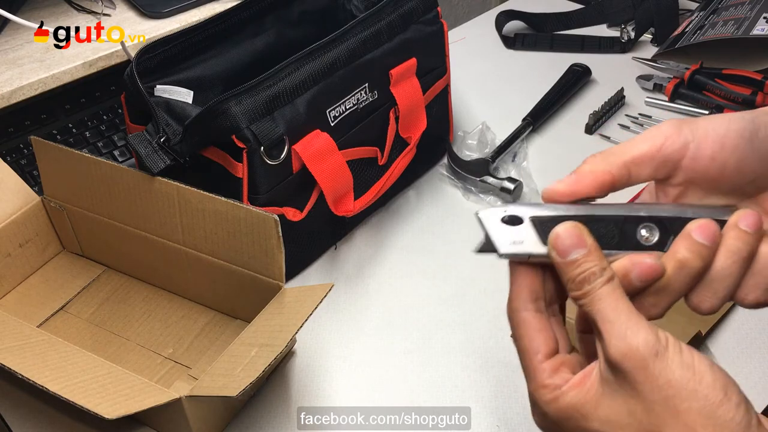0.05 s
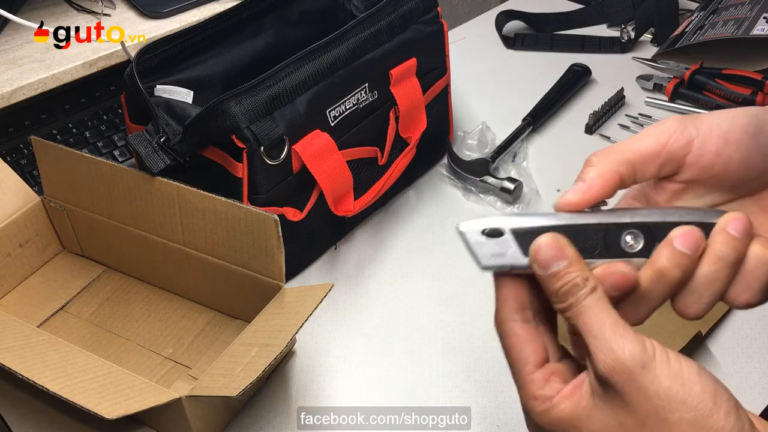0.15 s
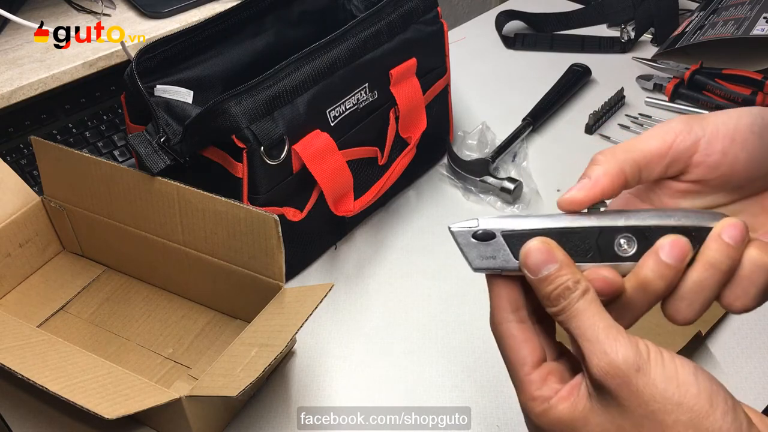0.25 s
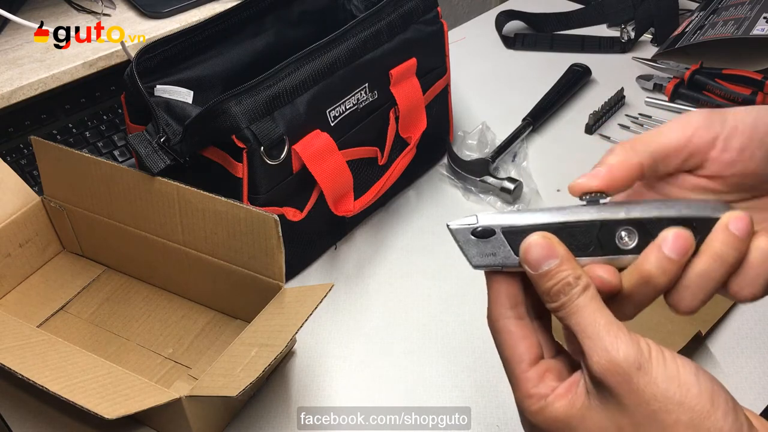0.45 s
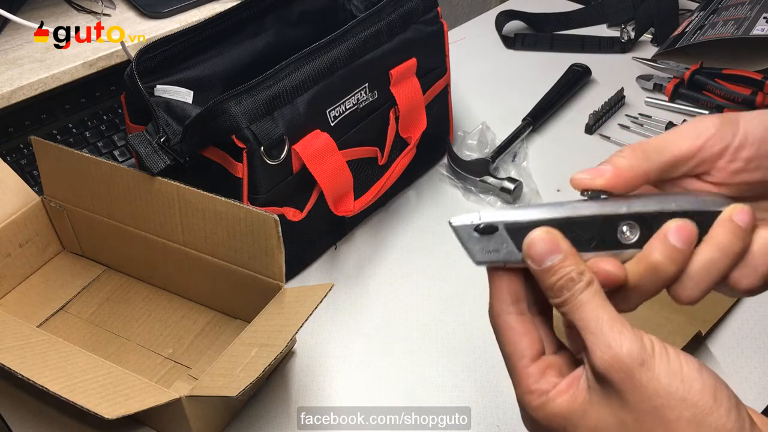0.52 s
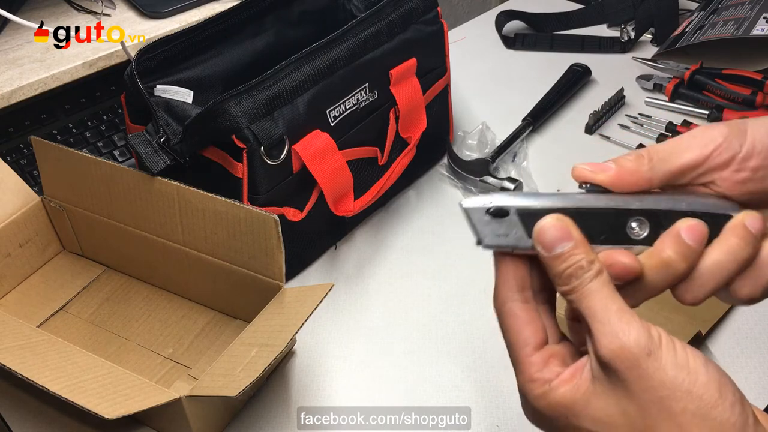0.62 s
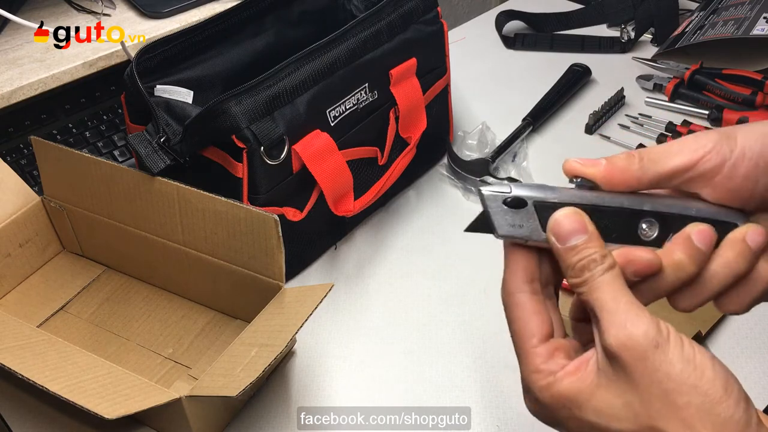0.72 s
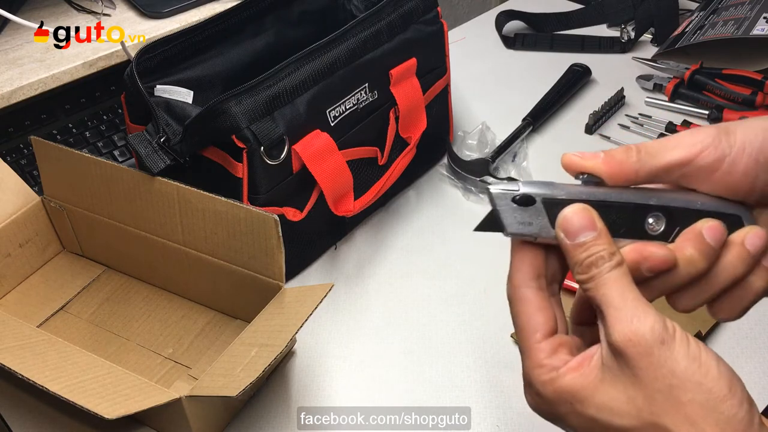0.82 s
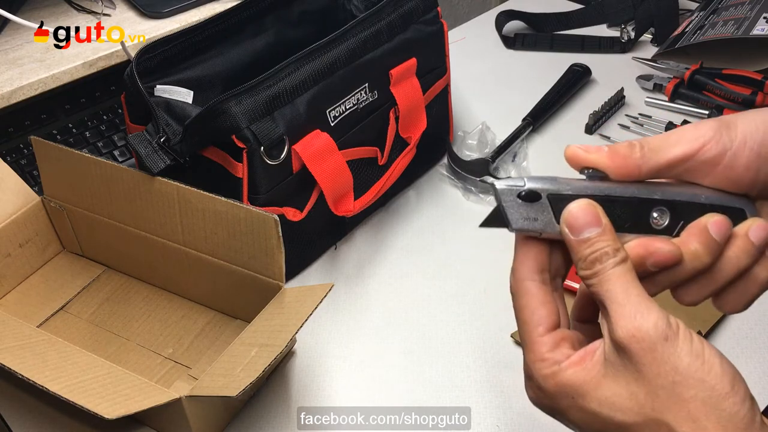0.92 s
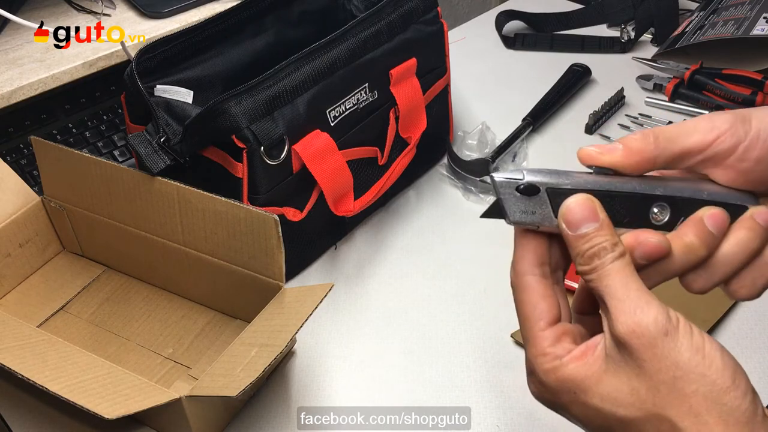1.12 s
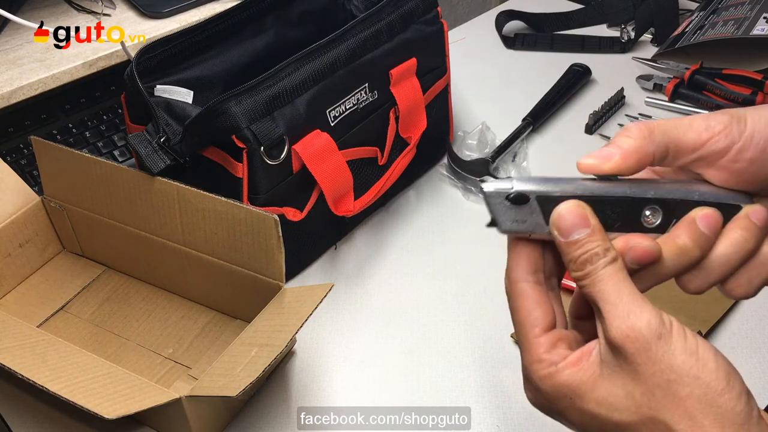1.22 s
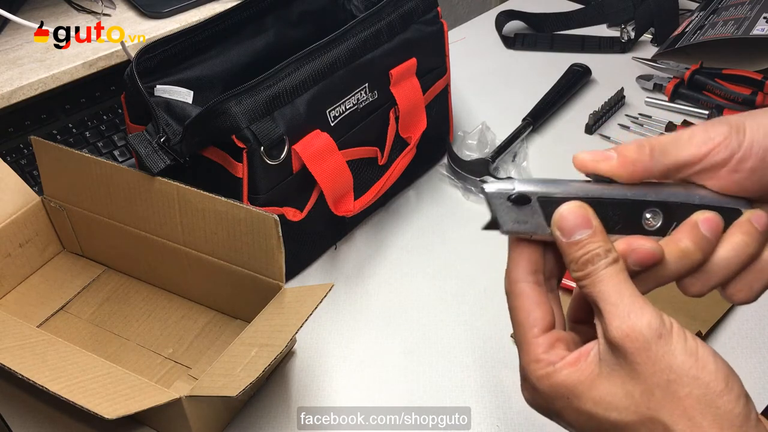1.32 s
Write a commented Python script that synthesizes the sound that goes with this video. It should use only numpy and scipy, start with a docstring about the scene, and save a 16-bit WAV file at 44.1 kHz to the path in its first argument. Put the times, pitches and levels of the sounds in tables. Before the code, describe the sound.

A metal retractable utility knife: sharp double clack, then a softer scrape and locking click.

```python
"""Scrapes, sharp clicks and light ticks of a metal utility knife, thumbed over a desk in a small room.
The blade carrier scrapes along its track, snaps through the notches and hits the back stop;
it is pushed out again until it locks with a ring of the blade, then starts back once more.
Steel knocks are damped resonances, chatter and scraping are filtered random contacts, and shell and
blade ring as decaying sines. Room scatter and tail, air tone and a low hum lie around the knife."""
import sys
import numpy as np
from scipy import signal
from scipy.fft import rfft, irfft
from scipy.io import wavfile

SR = 44100
rng = np.random.default_rng(int(sys.argv[2]) if len(sys.argv) > 2 else 0)


def master_out(mix):
    """Clip the mix to full scale and print it as 16-bit PCM to the path in sys.argv[1]."""
    frames = np.transpose(np.atleast_2d(mix))
    ceiling = np.clip(frames, -1, 1)
    pcm = np.round(ceiling * 32767).astype(np.int16)
    wavfile.write(sys.argv[1], SR, pcm)


N = 59535  # samples, 1.35 s

# Loud clicks of the mechanism. Each row: start in seconds, part that knocks, knock level in dB,
# chatter level in dB, chatter tilt in dB per octave, shell ring in dB, room tail in dB.
CLICK_EVENTS = [(0.2104, "latch", -16, -26, 2.5, -33, -10), (0.2427, "slider", -26, -34, 11, -54, -2),
                (0.2696, "stop", -16, -20, 3, -32, -9), (0.6490, "slider", -38, -45, -1, -49.5, -10.5),
                (0.8176, "lock", -29.5, -33, 2, -51.5, -15)]
# Light ticks of the loose blade and slider. Each row: start in seconds, level in dB, tilt in dB per octave.
TICK_EVENTS = [(0.0761, -50.5, 4.5), (0.125, -52.5, -3), (0.1561, -49, 1), (0.1673, -43, 0.5),
               (0.1722, -39.5, -5.5), (0.2108, -23.5, -3), (0.2134, -26, 1), (0.2476, -30.5, 1),
               (0.2714, -23, -3.5), (0.2771, -26.5, 0.5), (0.3638, -42.5, -8), (0.7055, -47.5, -6),
               (0.7233, -47.5, 22), (0.7303, -51, 5), (0.779, -53, 0), (0.8032, -52, 2), (0.813, -49.5, 13),
               (1.1567, -51.5, -2.5), (1.2028, -62.5, -5.5), (1.2135, -61.5, 0), (1.2503, -68, 4),
               (1.2825, -47.5, -4), (1.2985, -50.5, 11), (1.307, -53, -3.5)]
# Sliding of the carrier. Each row: time in seconds, scrape level in dB, fine grit level in dB.
SLIDE_LEVELS = [(0.0, -89, -83), (0.056, -69, -74.5), (0.085, -62, -63.5), (0.145, -54, -64),
                (0.174, -47, -59), (0.204, -56, -61.5), (0.3, -60, -64), (0.499, -70, -67.5),
                (0.64, -68.5, -68), (0.69, -65.5, -78), (0.721, -57.5, -72), (0.745, -47.5, -54),
                (0.774, -48.5, -64.5), (0.791, -64, -61), (0.815, -57.5, -59), (0.858, -76.5, -72.5),
                (1.14, -85.5, -85.5), (1.21, -79, -76.5), (1.268, -69, -80), (1.302, -43.5, -58),
                (1.32, -67, -68), (1.333, -53.5, -60.5), (1.35, -78, -61)]
# Blows that leave the blade ringing. Each row: start in seconds, level in dB.
BLADE_BLOWS = [(0.2106, -38), (0.8181, -40)]
# Damped resonances, listed by part name. Each row: frequency in Hz, relative level in dB.
PART_RESONANCES = {"latch": [(1450, -20), (2080, -9), (2520, -8.5), (3120, -2), (3800, -6.5), (4600, -14),
                   (5380, -6.5), (7850, -2.5), (8150, 3), (9500, -5), (9920, -12), (11300, -3.5),
                   (11900, -5.5), (14500, -11), (15250, -7.5)], "stop": [(1950, -7), (2510, -1.5),
                   (3200, -6), (3730, -9.5), (4300, -8), (5450, 0), (5850, 0), (6580, 3), (7250, 0),
                   (7970, -4.5), (9270, 2.5), (11400, 0.5), (13200, -4.5), (15000, -7)],
                   "lock": [(2420, -7.5), (3080, 2.5), (3280, -7), (4550, -21), (5500, -13), (5980, -5),
                   (6500, -5), (8350, -10.5), (9200, -6), (11000, -26), (12100, -22), (14000, -17),
                   (15400, -16)], "slider": [(2200, -2), (2480, 0), (3150, -4), (4000, -6.5), (4850, -3.5),
                   (5400, -7.5), (5900, -10.5), (6800, -6.5), (8200, -16), (10900, -21.5)]}
# Ringing modes of the handle shell. Each row: frequency in Hz, relative level in dB, 60 dB decay in seconds.
SHELL_MODES = [(1782, -9, .28), (1914, -2, .28), (1952, -2, .26), (2040, -3, .26), (2101, 0, .28),
               (2436, -1, .2), (2586, -4, .16), (3182, -6, .3), (3698, -7, .22), (4260, -8, .25),
               (5570, -9, .2), (5680, -9, .32), (5780, -8, .18), (5889, -7, .2), (6492, -12, .3),
               (6965, -13, .3)]
# Ringing modes of the blade. Each row: frequency in Hz, relative level in dB, 60 dB decay in seconds.
BLADE_MODES = [(3004, -8, .3), (3058, -3, .34), (3113, -5, .16), (3222, -5, .42), (3256, 0, .28),
               (3370, -8, .3), (3458, -4, .28), (6158, -17, .35)]
# Dull push of the whole handle at the back stop. Each row: frequency in Hz, relative level in dB.
THUMP_MODES = [(215, -4), (345, 2), (690, -2), (950, -0.5)]
# Spectrum of buzzing faces in a loud click. Each row: frequency in Hz, relative level in dB per Hz.
CHATTER_SPECTRUM = [(100, -43), (600, -11.5), (1100, -17), (1550, -17.5), (2100, 8), (2800, -8.5),
                    (3250, 9), (4200, 1), (6000, 3.5), (9300, -1), (10400, -4.5), (11700, -2.5),
                    (15500, -7)]
# Spectrum of a light tick. Each row: frequency in Hz, relative level in dB per Hz.
TICK_SPECTRUM = [(200, -36), (1300, -24.5), (1700, -11.5), (2150, 3), (2850, -7.5), (3300, 0), (4000, -8.5),
                 (6500, -1.5), (12000, -2), (15000, -20)]
# Spectrum of the carrier on its track. Each row: frequency in Hz, relative level in dB per Hz.
SCRAPE_SPECTRUM = [(200, -31.5), (1400, -18), (1650, -16), (1900, 3), (2300, 1), (2800, -5), (3250, -1),
                   (4200, -11.5), (5400, -17), (6800, -17), (7600, -19.5), (16000, -31)]
# Spectrum of the fine grit. Each row: frequency in Hz, relative level in dB per Hz.
GRIT_SPECTRUM = [(500, -36), (3000, -5.5), (5500, -0.5), (8000, -5.5), (9500, 1.5), (10400, -14.5),
                 (12000, -4), (15500, -16.5)]
# Decay of the room tail. Each row: frequency in Hz, 60 dB decay in seconds.
ROOM_DECAY = [(200, .35), (1300, 0.46), (3500, 0.37), (6500, 0.37), (10000, .22), (16000, 0.33)]
# Spectrum of the steady room air. Each row: frequency in Hz, relative level in dB per Hz.
AIR_SPECTRUM = [(25, -15), (50, -12), (75, -9.5), (105, -5.5), (125, -11), (160, -6), (220, -14),
                (500, -19.5), (1000, -21.5), (1800, -29), (3100, -37.5), (8000, -44), (16000, -48.5)]

KNOCK_T60_S, KNOCK_SPREAD_S, KNOCK_LOW_HZ = .008, .0006, 1440
SEAT_POWER = 1.3  # above 1, the damping grows with time
CHATTER_T60_S, TICK_T60_S, CONTACT_RISE_S = .011, .012, .0003
GRAINS_PER_S, SCRAPE_SPREAD_DB, GRIT_SPREAD_DB = 2500, 3.5, 1
SCRAPE_RING_DB = -10  # relative to the scrape
THUMP_S, THUMP_T60_S, THUMP_DB = 0.2703, .035, -47
EARLY_DB, EARLY_T60_S, SMALL_ROOM_DB = -10.5, .055, -14
SIDE_SHARE = 0.25  # energy share of the room sound that leaves the knife's other sides
ROOM_TONE_DB = -61.5
HUM_HZ, HUM_DB, HUM_WAVER_DB = 49, -61, 2
BUMP_S, BUMP_RISE_S, BUMP_HZ, BUMP_DB = 0.815, .028, 88, -53
CUTOFF_HZ = 15900


def amp(db):
    """Decibels to gain."""
    return 10 ** (np.asarray(db) / 20)


def decay(t, t60):
    """Exponential decay that falls 60 dB in t60 seconds."""
    return np.exp(-np.log(1000) * t / t60)


def unit(x):
    """Scales to an rms of one."""
    return x / np.sqrt(np.mean(x ** 2) + 1e-20)


def blow(x):
    """Scales a short sound to the energy of 2.5 ms at an rms of one."""
    return x * np.sqrt(.0025 * SR / (np.sum(x ** 2) + 1e-20))


def read(points, hz):
    """Reads a frequency table on a log-frequency axis."""
    f, value = np.transpose(points)
    return np.interp(np.log(hz + 1), np.log(f + 1), value)


def add(mix, s, sound):
    """Mixes a sound in at time s."""
    part = mix[max(0, round(s * SR)):][:len(sound)]
    part += sound[:len(part)]


def colour(x, points, tilt_db=0):
    """Causal minimum-phase filter with the given spectrum, tilted per octave above 2 kHz."""
    hz = abs(np.fft.fftfreq(4096, 1 / SR))
    octaves = np.log2(np.maximum(hz, 2000) / 2000)
    log_gain = np.log(amp(read(points, hz) + tilt_db * octaves))
    # the Hilbert transform of the log gain gives the phase
    taps = np.fft.ifft(np.exp(np.conj(signal.hilbert(log_gain)))).real
    return signal.fftconvolve(x, taps[:len(taps) // 2])[:len(x)]


def click(part, knock_db, chatter_db, tilt_db, shell_db, room_db):
    """A part knocks home, chatters and sets the shell ringing; the room answers."""
    direct, sides = np.zeros((2, SR * 3 // 4))
    add(direct, 0, amp(knock_db) * knock(PART_RESONANCES[part]))
    add(direct, 0, amp(chatter_db) * chatter(CHATTER_T60_S, CHATTER_SPECTRUM, tilt_db))
    add(direct, 0, amp(shell_db) * ring(SHELL_MODES))
    # the other sides, without the part's resonances, are heard only through the room
    impulse = signal.unit_impulse(SR // 20)
    add(sides, 0, amp(knock_db) * blow(colour(impulse, CHATTER_SPECTRUM, tilt_db)))
    front_room = np.sqrt(1 - SIDE_SHARE) * room(direct, room_db)
    side_room = np.sqrt(SIDE_SHARE) * room(sides, room_db)
    return direct + front_room + side_room


def knock(modes):
    """Resonances of a small steel part: its faces meet one after another, and damping grows as it seats."""
    t = np.arange(SR // 20) / SR
    out = np.zeros(len(t))
    for hz, db in modes:
        age = np.maximum(t - KNOCK_SPREAD_S * rng.random(), 0)
        seating = np.exp(-np.log(1000) * (age / KNOCK_T60_S) ** SEAT_POWER)
        out += amp(db) * seating * np.sin(2 * np.pi * hz * age)
    highpass = signal.butter(3, KNOCK_LOW_HZ, "high", fs=SR, output="sos")
    return blow(signal.sosfilt(highpass, out))


def chatter(t60, spectrum, tilt_db):
    """Metal faces buzz against each other for a few milliseconds, as decaying random contacts."""
    t = np.arange(SR // 20) / SR
    rise = np.minimum(t / CONTACT_RISE_S, 1)
    contacts = rng.choice([-1., 1.], len(t)) * rise * decay(t, t60)
    return blow(colour(contacts, spectrum, tilt_db))


def ring(modes):
    """Long-lived modes after one blow, each a decaying sine at a random phase."""
    t = np.arange(SR // 2) / SR
    out = np.zeros(len(t))
    for hz, db, t60 in modes:
        out += amp(db - 60 * t / t60) * np.sin(2 * np.pi * (hz * t + rng.random()))
    return blow(out)


def slide():
    """The carrier slips along its track, sounding the hollow handle, with fine grit above."""
    t = np.arange(N) / SR
    s, scrape_db, grit_db = np.transpose(SLIDE_LEVELS)
    scrape = unit(colour(slips(SCRAPE_SPREAD_DB), SCRAPE_SPECTRUM)) * amp(np.interp(t, s, scrape_db))
    grit = unit(colour(slips(GRIT_SPREAD_DB), GRIT_SPECTRUM)) * amp(np.interp(t, s, grit_db))
    shell = unit(signal.fftconvolve(scrape, ring(SHELL_MODES))[:N]) * scrape.std()
    return scrape + grit + amp(SCRAPE_RING_DB) * shell


def slips(spread_db):
    """A random train of tiny slips of uneven size."""
    size = amp(spread_db * np.minimum(rng.exponential(1, N), 4))
    sign = rng.choice([-1., 1.], N)
    happens = rng.random(N) < GRAINS_PER_S / SR
    return unit(size * sign * happens)


def blade():
    """The thin blade rings on in a cluster of close tones."""
    out = np.zeros(N)
    for s, db in BLADE_BLOWS:
        add(out, s, amp(db) * ring(BLADE_MODES))
    return out


def ticks():
    """Light contacts as the slider takes up its play."""
    out = np.zeros(N)
    for s, db, tilt_db in TICK_EVENTS:
        add(out, s, amp(db) * chatter(TICK_T60_S, TICK_SPECTRUM, tilt_db))
    return out


def thump():
    """The handle recoils in the hand, a few low modes that die together."""
    t = np.arange(SR // 10) / SR
    modes = sum(amp(db) * np.sin(2 * np.pi * (hz * t + rng.random())) for hz, db in THUMP_MODES)
    out = np.zeros(N)
    add(out, THUMP_S, amp(THUMP_DB) * blow(modes * decay(t, THUMP_T60_S)))
    return out


def room(x, wet_db):
    """Close scatter and the short tail of the room, both decaying noise, without the direct sound."""
    t = np.arange(SR // 2) / SR
    # each band of the tail decays at its own rate
    hz, age, bands = signal.stft(rng.standard_normal(len(t)), SR, nperseg=256)
    bands = bands * decay(age, read(ROOM_DECAY, hz)[:, None])
    tail = signal.istft(bands, SR, nperseg=256)[1][:len(t)]
    tail = tail * np.clip(t / 0.0011 - 1, 0, 1)  # fades in from 1.1 to 2.2 ms
    early = rng.standard_normal(len(t)) * (t > .002) * decay(t, EARLY_T60_S)
    echo = amp(wet_db) * tail / np.linalg.norm(tail)
    echo += amp(EARLY_DB) * early / np.linalg.norm(early)
    return signal.fftconvolve(x, echo)[:len(x)]


def background():
    """Room tone as shaped noise, a wavering low hum and one soft bump of the hand."""
    t = np.arange(N) / SR
    air_gain = amp(read(AIR_SPECTRUM, np.fft.rfftfreq(N, 1 / SR)))
    air = unit(irfft(rfft(rng.standard_normal(N)) * air_gain, N))
    # ten slow sines from 2 to 10 Hz move the hum's level
    waver = unit(sum(np.sin(2 * np.pi * (hz * t + rng.random())) for hz in np.geomspace(2, 10, 10)))
    hum = unit(np.sin(2 * np.pi * (HUM_HZ * t + rng.random())) * amp(HUM_WAVER_DB * waver))
    age = np.maximum(t - BUMP_S, 0)
    swell = age / BUMP_RISE_S * np.exp(1 - age / BUMP_RISE_S)
    bump = swell * np.sin(2 * np.pi * BUMP_HZ * age)
    return amp(ROOM_TONE_DB) * air + amp(HUM_DB) * hum + amp(BUMP_DB) * bump


def scene():
    """The knife in the room, as one channel."""
    small = ticks() + slide() + blade() + thump()
    out = small + room(small, SMALL_ROOM_DB) + background()
    for s, *hit in CLICK_EVENTS:
        add(out, s, click(*hit))
    return out[None]


def record(dry):
    """The recorder's band limit, a linear-phase low-pass."""
    lowpass = signal.firwin(255, CUTOFF_HZ, window=("kaiser", 9), fs=SR)
    return signal.oaconvolve(dry, lowpass[None], "same")


dry = scene()
out = record(dry)
master_out(out)
```